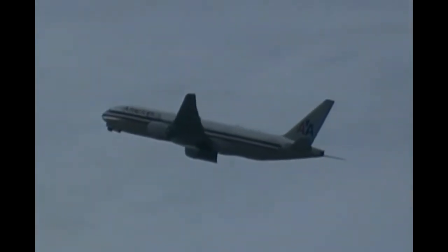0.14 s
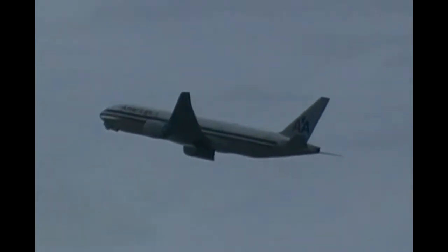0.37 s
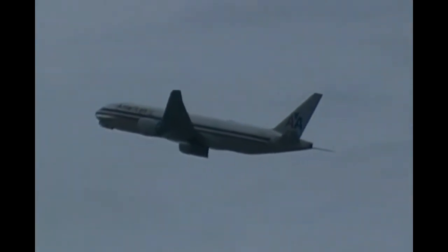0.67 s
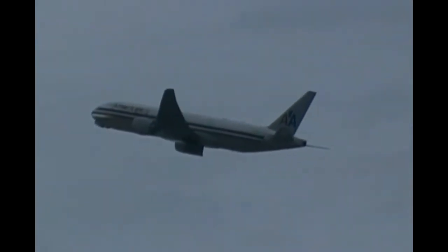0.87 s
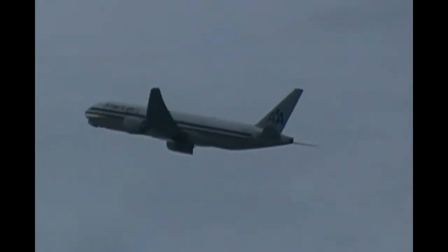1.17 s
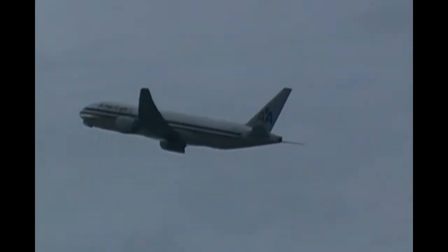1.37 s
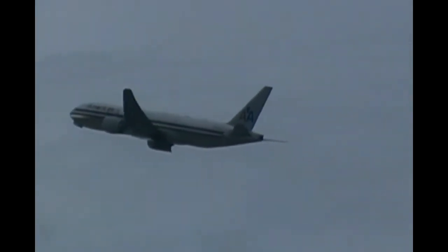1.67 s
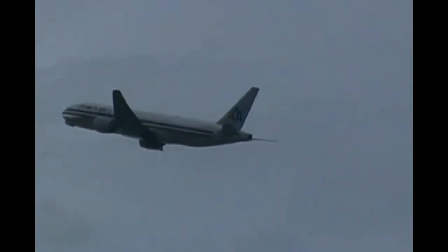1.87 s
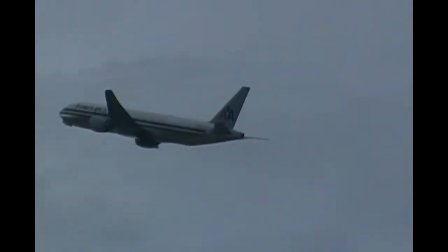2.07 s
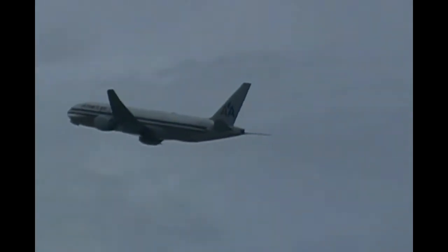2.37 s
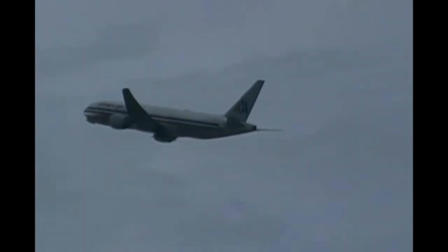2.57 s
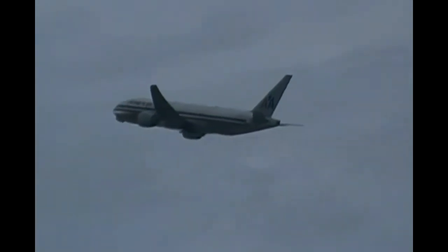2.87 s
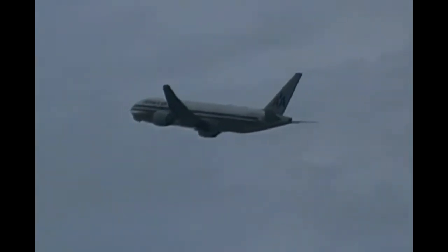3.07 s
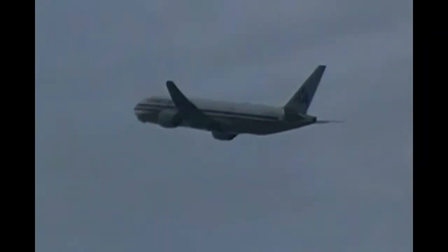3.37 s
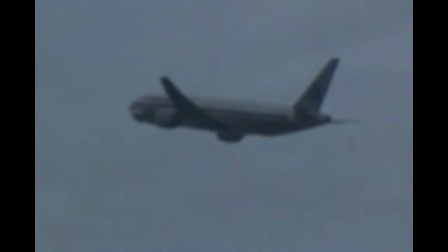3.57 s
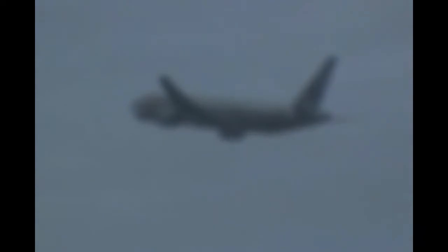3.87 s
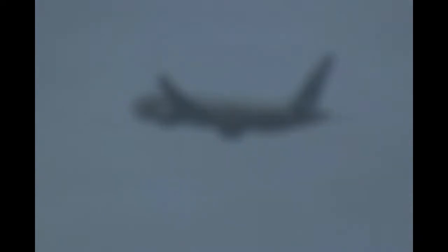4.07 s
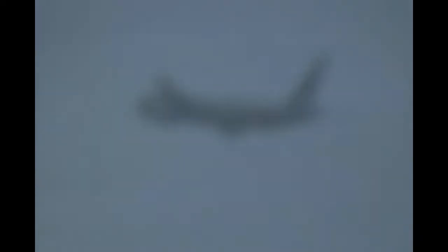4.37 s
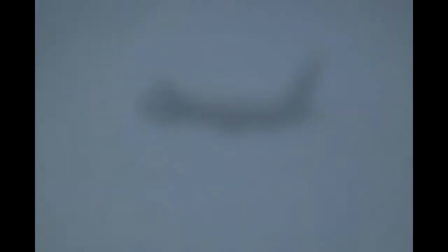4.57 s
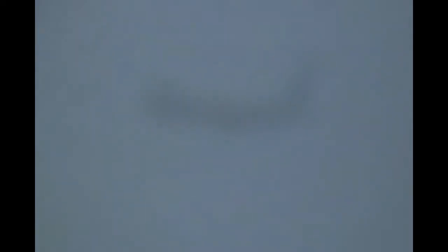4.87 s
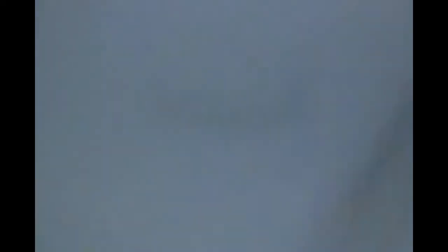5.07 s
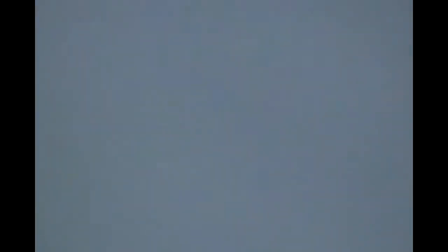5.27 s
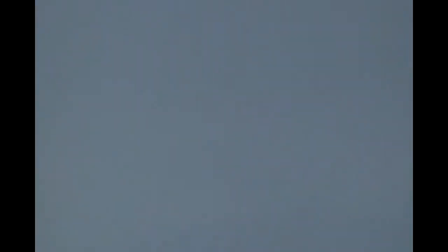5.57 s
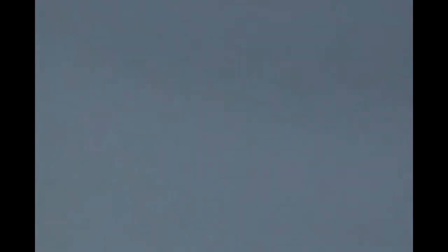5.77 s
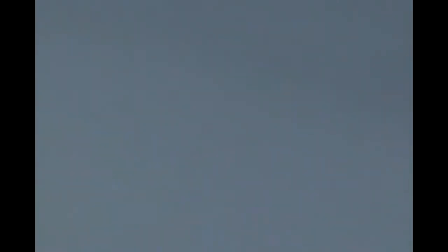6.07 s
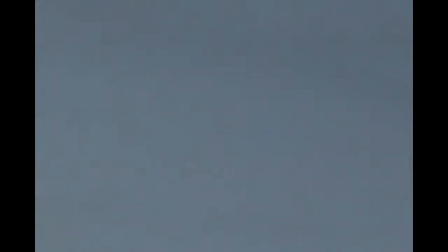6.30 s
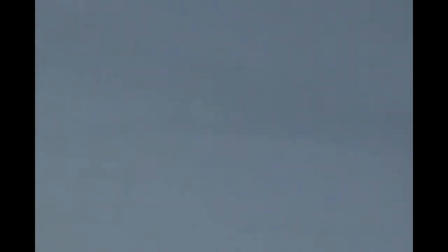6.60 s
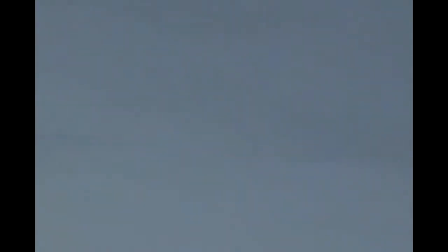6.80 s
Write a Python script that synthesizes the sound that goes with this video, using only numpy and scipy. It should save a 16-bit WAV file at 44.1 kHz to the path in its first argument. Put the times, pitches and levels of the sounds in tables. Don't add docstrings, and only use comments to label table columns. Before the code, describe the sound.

A large jet airliner's roar swells and fades outdoors, wind buffeting the microphone, then a brighter roar with fan whine and small bird chirps.

```python
import sys
import numpy as np
from scipy import signal
from scipy.fft import rfft, irfft, next_fast_len
from scipy.io import wavfile
from scipy.ndimage import uniform_filter1d, map_coordinates

SR = 44100
rng = np.random.default_rng(int(sys.argv[2]) if len(sys.argv) > 2 else 0)


def generate_wav(sig):
    pcm = np.round(np.clip(np.atleast_2d(sig).T, -1, 1) * 32767).astype(np.int16)
    wavfile.write(sys.argv[1], SR, pcm)


def how_loud(loudness_db):
    steps = np.asarray(loudness_db, float) / 20
    return 10 ** steps


N = 306054


def unit(x):
    return x / np.sqrt(np.mean(x ** 2) + 1e-20)


def along(points, hz):
    f, v = np.transpose(points)
    return np.interp(np.log(hz + 1), np.log(f + 1), v)


def columns(rows, t):
    s, *cols = np.transpose(rows)
    return [np.interp(t, s, c) for c in cols]


def wobble(rate, t):
    return map_coordinates(rng.standard_normal(200 * 7), [t * min(rate, 199)])


def filtered(x, response):
    m = next_fast_len(N + SR // 4)
    return irfft(rfft(x, m) * response(np.fft.rfftfreq(m, 1 / SR)), m)[..., :N]


def sides(lean_db):
    return how_loud(np.array([lean_db / 2, -lean_db / 2]))


# (frequency [Hz], level [dB per Hz])
HISS = [(2000, -7.5), (5000, -1), (8000, -9), (9500, -18), (12000, -19)]


def hiss(level_db=-64):
    noise = filtered(rng.standard_normal((2, N)), lambda hz: how_loud(along(HISS, hz)))
    return how_loud(level_db) * unit(noise)


# (time [s], level [dB], treble tilt [dB per octave]); the air between takes the top
ROAR = [(0, -21, -0.5), (.3, -20.5, 0.5), (.5, -22.5, -1.5), (.75, -22.5, 0), (1.2, -24, 0),
        (1.45, -21.5, -1), (1.8, -23, .5), (2.2, -21, -1.5), (2.65, -20, 0), (2.95, -23, -2.5),
        (3.25, -28, -1.5), (3.75, -27.5, -2.5), (4.15, -30.5, -0.5), (4.5, -36, 2), (4.75, -28.5, 2),
        (5.25, -20, 0), (5.7, -21.5, 0), (6.94, -20.5, -.5)]
# (time [s], gain [dB], centre [Hz], half length [s])
SWELLS = [(0.145, 2.5, 1295, 0.02), (0.822, 4.5, 291.4, 0.02), (0.842, 2.5, 2590, 0.022),
          (0.923, 5.5, 301, 0.027), (1.051, 5.5, 354, 0.046), (1.082, 2.5, 2510, 0.071),
          (1.342, 6.5, 303.4, 0.051), (1.551, 3, 919, 0.054), (1.669, 6.5, 1367, 0.076),
          (1.932, 7, 356, 0.031), (2.318, -0.5, 353, 0.068), (2.695, 5, 346, 0.076),
          (2.809, 3.5, 491, 0.03), (2.886, 6.5, 400, 0.0087), (3.195, 5, 150, .08),
          (3.354, 10, 509, 0.0081), (3.427, 6, 518, .02), (3.513, 5.5, 405, 0.017),
          (3.696, 6.5, 799, 0.063), (3.88, 3.5, 394, 0.052), (4.137, 3.5, 295, 0.037),
          (4.294, 7, 1803, 0.022), (4.451, 4, 507, 0.023), (5.286, 16.5, 357, 0.0028),
          (5.629, 3, 2895, 0.11), (6.443, 5, 298, 0.016), (6.708, 3, 1513, 0.082), (6.462, 3, 1532, 0.23),
          (1.198, 6.5, 200, 0.086), (1.111, 3, 1800, 0.01), (1.33, 2, 1545, .02), (1.734, 5, 410, .02),
          (1.474, 4, 298, 0.045), (6.329, 0, 776, 0.087), (5.422, 0, 3040, 0.079), (2.997, 2.5, 987, 0.007),
          (4.668, 5, 200, 0.061)]
TILT_FROM_HZ, SWELL_OCTAVES = 810, 1.96


def air_db(hz, t):
    level_db, tilt = columns(ROAR, t)
    octaves = lambda ref: np.log2(np.maximum(hz, 20)[:, None] / ref)
    s, db, centre, half = np.transpose(SWELLS)
    in_band = db * np.exp(-(octaves(centre) / SWELL_OCTAVES) ** 2)
    in_time = np.exp(-((t[:, None] - s) / half) ** 2)
    return level_db + octaves(TILT_FROM_HZ).clip(0) * tilt + in_band @ in_time.T


# (frequency [Hz], level [dB per Hz])
FAR_SPECTRUM = [(22, -26), (110, -5.5), (280, 1.5), (380, -5.5), (480, -1), (640, -12), (1080, -17.5),
                (2400, -19), (2700, -29), (3650, -24), (3950, -34), (5000, -42), (7000, -51.5),
                (11500, -75)]
BRIGHT_SPECTRUM = [(22, -36), (45, -5), (130, -1.5), (350, 2.5), (450, -4), (640, 0.5), (900, -3.5),
                   (1100, -3), (1960, -6.5), (2400, -11.5), (3640, -21), (5000, -28.5), (7500, -34.5),
                   (11500, -49)]
# (time [s], share of the brighter roar [0-1])
TURN = [
    (4.2, 0.25),
    (4.6, 1),
]
# (frequency [Hz], left-right likeness [0-1])
FAR_ALIKE = [(60, 0.69), (190, 0.45), (580, 0.67), (1800, 1), (3500, 0.9), (6000, 0.53), (9000, 0.83)]
BRIGHT_ALIKE = [(60, 0.89), (190, 0.97), (580, 0.99), (1800, 0.98), (3500, 0.81), (6000, 0.71),
                (9000, 0.17)]
# (frequency [Hz], left minus right [dB])
FAR_LEAN = [(60, -2), (93, -8), (150, 3), (230, -2.5), (350, -3), (550, -3), (850, -1.5), (1320, 1.5),
            (2050, -1), (3190, 0.5)]
BRIGHT_LEAN = [(60, -4), (93, -2), (150, -1.5), (230, -2.5), (350, -2), (550, -1), (850, -1.5), (1320, -1),
               (2050, -0.5), (3190, -0.5)]


def roar(patchy_db=0.5, swell_db=0.22, crackle_db=0.7):
    shocks = how_loud(crackle_db * wobble(150, np.arange(N) / SR))
    noise = unit(shocks * rng.standard_normal((2, N)))
    hz, t, z = signal.stft(noise, SR, nperseg=1024, noverlap=768)
    share = columns(TURN, t)[0].clip(0, 1)
    blend = lambda far, bright: np.outer(along(far, hz), 1 - share) + np.outer(along(bright, hz), share)
    colour = blend(FAR_SPECTRUM, BRIGHT_SPECTRUM)
    colour = colour - 10 * np.log10(np.mean(how_loud(2 * colour), 0))

    patches = uniform_filter1d(rng.standard_normal(colour.shape), size=12, axis=0)
    patches = uniform_filter1d(patches, size=12, axis=1)
    gain = how_loud(colour + air_db(hz, t) + patchy_db * unit(patches) + swell_db * wobble(13, t))

    turn = np.arccos(blend(FAR_ALIKE, BRIGHT_ALIKE).clip(0, 1)) / 2
    mid_z, side_z = np.cos(turn) * z[0], np.sin(turn) * z[1]
    pair = gain * sides(blend(FAR_LEAN, BRIGHT_LEAN)) * [mid_z + side_z, mid_z - side_z]
    return signal.istft(pair, SR, nperseg=1024, noverlap=768)[1][:, :N]


# (time [s], peak [dB], left minus right [dB], ring t60 [s])
TICKS = [(0.0637, -35, 0, .006), (0.077, -27.5, -5, 0.0059), (3.945, -45, -0.5, 0.0058),
         (4.336, -36, -1.5, 0.0032), (4.372, -33.5, 6, 0.0074), (4.43, -33.5, 2, 0.0072),
         (4.5022, -33, -1, 0.0052), (4.5453, -23.5, -2, 0.0066), (5.2357, -11, 2, 0.015),
         (5.378, -36, 5.5, 0.0072), (6.079, -30.5, 3, .006)]
# (frequency [Hz], width [Hz], level [dB])
BODY = [
    (2200, 800, 2),
    (3050, 500, 7),
    (4200, 1000, -4),
    (5800, 1000, -9),
    (7800, 1200, -14),
]


def ticks():
    x, t = np.zeros((2, N + SR)), np.arange(SR // 20) / SR
    for s, db, lean, t60 in TICKS:
        crack = rng.standard_normal(len(t)) + .7 * rng.standard_normal((2, len(t)))
        crack[:, 0] = 5
        x[:, round(s * SR):][:, :len(t)] += how_loud(db + 8 - 60 * t / t60) * sides(lean)[:, None] * crack

    def shell(f):
        return sum((-1) ** k * how_loud(db) * 1j * f * w / (c * c - f * f + 1j * f * w)
                   for k, (c, w, db) in enumerate(BODY))

    return filtered(x[:, :N], shell)


# (time [s], peak [dB], left minus right [dB])
LIGHT_GUSTS = [(0.4516, -51, -34), (0.5694, -47.5, -19), (0.7074, -43, -3), (0.9185, -54, -34),
               (1.1135, -47, -14), (1.5927, -48.5, -40), (1.9843, -47, -35), (2.1025, -56.5, -31),
               (2.4001, -48, -16), (2.8368, -53.5, -24), (3.241, -50.5, -15), (3.3607, -58, -15),
               (4.0194, -60, -19), (4.1837, -48.5, -9.5), (5.8611, -47, -21), (5.9004, -37.5, -14),
               (6.0303, -46.5, -33)]
# (time [s], peak [dB], left minus right [dB])
SHOVES = [
    (2.976, -47.5, -19.5),
    (5.262, -49, -13.5),
    (5.275, -54, -27.5),
    (5.2913, -42, -13.5),
    (5.298, -42.5, -16),
]
SHOVE_RISE_S, SHOVE_FALL_S, SHOVE_TAIL_S, SHOVE_TAIL_DB = .004, .003, .01, -8
# (start [s], end [s])
HURRIED = [
    (2.9765, 2.986),
    (5.2725, 5.277),
    (5.2875, 5.296),
]
USUAL_GAP, HURRIED_GAP = 43, 34


def gain_steps(sag_hz=500):
    t = np.arange(N) / SR
    pressure = np.zeros((2, N))
    flap = .5 + np.array([wobble(199, t), wobble(199, t)])
    for s, db, lean in SHOVES:
        after = (t - s).clip(0)
        tail = how_loud(SHOVE_TAIL_DB) * np.exp(-after / SHOVE_TAIL_S)
        fall = np.maximum(np.exp(-after / SHOVE_FALL_S), tail)
        rise = np.exp(-(s - t).clip(0) / SHOVE_RISE_S)
        pressure += np.outer(how_loud(db + 28.5) * sides(lean), rise * fall)
    for s, db, lean in LIGHT_GUSTS:
        swell = np.exp(-((t - s - .006) / 0.028) ** 2)
        pressure += np.outer(how_loud(db + 11) * sides(np.clip(lean, -12, 12)), swell) * flap

    hurried = sum((t > start) & (t < end) for start, end in HURRIED)
    clock = np.cumsum(1 / np.where(hurried, HURRIED_GAP, USUAL_GAP))
    steps = np.diff(np.floor(clock), prepend=0) * how_loud(2.2 * rng.standard_normal((2, N)))
    sag = lambda hz: 1j * hz * SR / (2 * np.pi) / (sag_hz + 1j * hz) ** 2
    return filtered(pressure * steps * [[1], [-1]], sag)


# (time of the deepest point [s], depth [dB])
DUCKS = [(.50, -4), (0.621, 1), (0.723, 4), (.95, 0.5), (1.124, 3.5), (1.615, 6), (1.999, 4), (2.119, 3.5),
         (2.395, 4), (2.86, -2.5), (2.993, 14), (3.095, 8), (3.371, -1), (3.929, 1.5), (4.222, 1),
         (5.313, 20.5), (5.869, 10.5), (5.905, 12.5), (6.049, 11.5), (6.164, 6.5)]
DUCK_DB_PER_S, RECOVER_DB_PER_S, DUCK_HOLD_S = 903.5, 105.5, 0.018


def ducking():
    t = np.arange(0, N / SR, .001)
    cuts = []
    for s, db in DUCKS:
        attack = DUCK_DB_PER_S * (s - t).clip(0)
        release = RECOVER_DB_PER_S * (t - s - DUCK_HOLD_S).clip(0)
        cuts.append(db - attack - release)
    return how_loud(-np.interp(np.arange(N) / SR, t, np.max(cuts, 0).clip(0)))


# (time [s], peak [dB], left minus right [dB], pitch [Hz])
POPS = [
    (3.136, -19, 5, 444),
    (3.344, -18, 12, 444),
    (3.829, -16.5, -23.5, 457),
    (3.899, -15.5, -20.5, 467),
    (5.886, -19.5, -16, 423),
]


def pops():
    x, t = np.zeros((2, N)), np.arange(SR // 50) / SR
    for s, db, lean, hz in POPS:
        u = 2 * np.pi * hz * t
        x[:, round(s * SR):][:, :len(t)] += np.outer(how_loud(db) * sides(lean), np.sin(u) * np.exp(-u / 5))
    return x


# (time [s], pitch [Hz], level above the roar [dB])
WHINE = [
    (4.5, 1003, -22),
    (4.62, 1007, -6),
    (5.2, 1006, -7.5),
    (5.8, 979, -7),
    (6.2, 984, -10),
    (6.94, 995, -7),
]
# (multiple of the pitch, level [dB])
ORDERS_OF_FAN = [
    (1, 4.5),
    (1.121, -2.5),
    (1.5, -12),
    (2, -9),
]


def whine(flutter_db=4, smear=1.5, below_db=-3.5):
    t = np.arange(N) / SR
    pitch, db = columns(WHINE, t)
    phase = 2 * np.pi * np.cumsum(pitch) / SR
    tones = 0
    for k, level in ORDERS_OF_FAN:
        strength = how_loud(level + flutter_db * wobble(25, t))
        tones = tones + strength * np.sin(k * phase + smear * wobble(30, t))
    return how_loud(columns(ROAR, t)[0] + below_db + db) * (t > WHINE[0][0]) * tones


# (time [s], length [s], top pitch [Hz], level [dB])
DROPPING = [
    (4.576, .031, 5350, -41),
    (5.625, .031, 5400, -35.5),
    (6.479, .027, 5350, -39),
    (6.504, .03, 5450, -43),
]
RISING = [
    (4.637, .033, 4550, -40.5),
    (4.768, .025, 3950, -44),
    (4.829, .024, 3600, -41),
    (5.68, .04, 4600, -35),
    (6.54, .034, 4500, -39),
]
DROP_BEND = [
    (0, .87),
    (.33, 1),
    (.5, .96),
    (1, .78),
]
RISE_BEND = [
    (0, .73),
    (.5, .91),
    (.62, 1),
    (1, .74),
]


def bird(echo_db=-11):
    x = np.zeros(N)
    for notes, bend in (DROPPING, DROP_BEND), (RISING, RISE_BEND):
        for s, length, top_hz, db in notes:
            u = np.arange(round(length * SR)) / (length * SR)
            phase = 2 * np.pi * np.cumsum(top_hz * columns(bend, u)[0]) / SR
            x[round(s * SR):][:len(u)] += how_loud(db) * np.sin(np.pi * u) ** .4 * np.sin(phase)
    delays_s = .005, .013, .022, .031, .04, .052, .067, .085
    echoes = lambda hz: 1 + sum(how_loud(echo_db - 70 * d) * np.exp(-2j * np.pi * hz * d) for d in delays_s)
    return filtered(x * how_loud(3 * wobble(199, np.arange(N) / SR)), echoes)


def port_delay(x, lag_s=2 / 44100):
    return filtered(x, lambda hz: np.exp(-1j * np.pi * hz * lag_s * np.array([[1], [-1]])))


def scene():
    gain = ducking()
    far = gain * (roar() + whine()) + bird()
    return port_delay(far) + ticks() + gain * gain_steps() + pops() + gain ** 0.1 * hiss()


def band_limits(x, top_hz=12200):
    return filtered(x, lambda hz: hz ** 2 / (hz ** 2 + 30 ** 2) / (1 + (hz / top_hz) ** 60))


BLOCK, BLOCK_SHIFT = 4096, 1548
STEP_DB, STEP_DB_PER_KHZ, STEP_SCATTER_DB = -80.5, 1.2, 4.5
STEP_FOLLOWS = .55


def spectral_steps(x):
    blocks = dict(window="cosine", nperseg=BLOCK, noverlap=BLOCK // 2)
    hz, _, z = signal.stft(np.pad(x, ((0, 0), (BLOCK_SHIFT, 0))), SR, **blocks)
    power = np.sum(abs(z[:, (hz > 900) & (hz < 3000)]) ** 2, axis=(0, 1)) + 1e-9
    bands = rng.standard_normal((2, 43, z.shape[2]))
    bands = np.repeat(bands, 48, axis=1)[:, :len(hz)]
    rise_db = STEP_DB_PER_KHZ * (hz[:, None] / 1000 - 8).clip(0)
    step = how_loud(STEP_DB + rise_db + STEP_SCATTER_DB * bands) * (power / power.mean()) ** (STEP_FOLLOWS / 2)
    return signal.istft(step * np.round(z / step), SR, **blocks)[1][:, BLOCK_SHIFT:][:, :N]


# (time [s], peak [dB])
SLIPS = [(3.3089, -48), (3.6416, -82.5), (3.676, -79), (3.7085, -71.5), (3.7751, -73.5), (3.8415, -77.5),
         (3.9089, -78), (4.0083, -72), (4.0745, -63.5), (4.1415, -74), (4.2094, -75), (4.2749, -78),
         (4.3083, -69), (4.3416, -72.5), (4.6084, -80), (4.775, -74), (4.8748, -76), (5.0746, -79)]


def slips(x):
    for s, db in SLIPS + [(0, -24.5), (6.9395, -43)]:
        x[:, round(s * SR)] += how_loud(db + 12.5)
    return x


def top_cut(x):
    return signal.sosfilt(signal.butter(12, 15600, fs=SR, output="sos"), x)


def record(dry):
    mix = slips(spectral_steps(band_limits(dry)))
    return top_cut(mix)


dry = scene()
out = record(dry)
generate_wav(out)
```